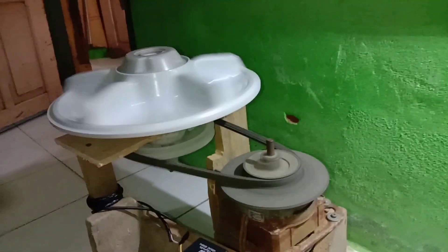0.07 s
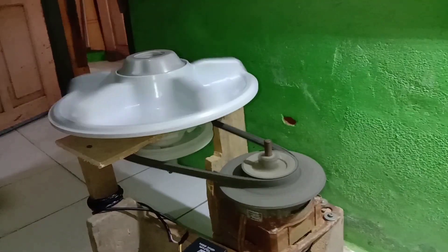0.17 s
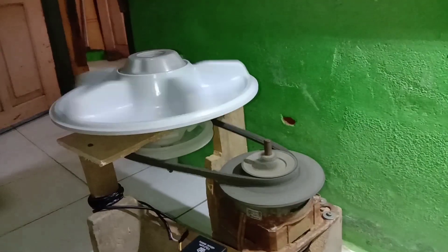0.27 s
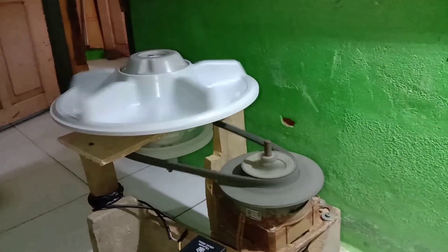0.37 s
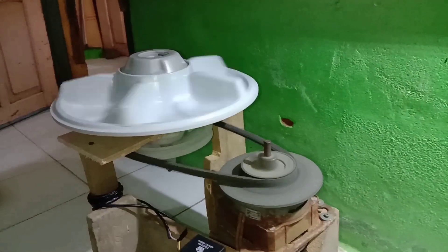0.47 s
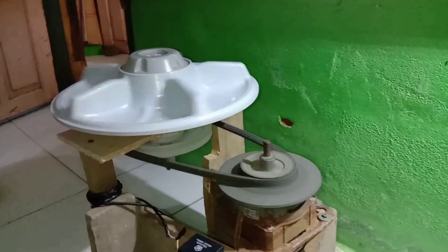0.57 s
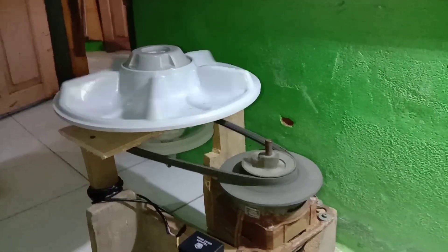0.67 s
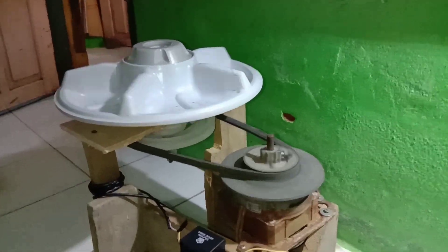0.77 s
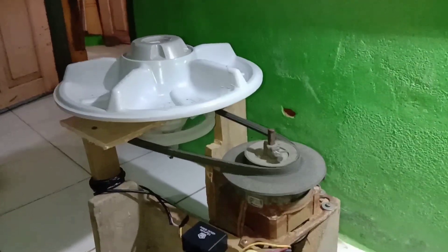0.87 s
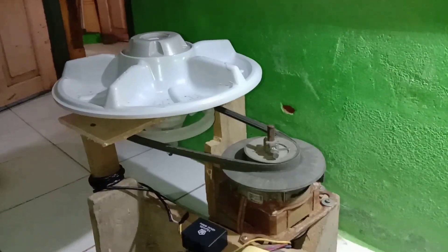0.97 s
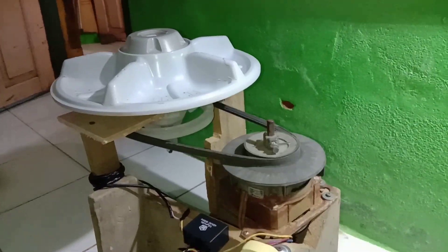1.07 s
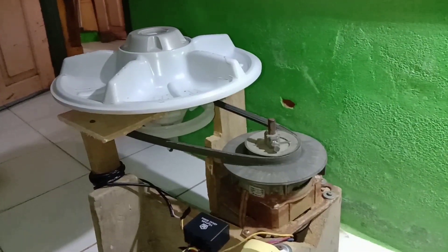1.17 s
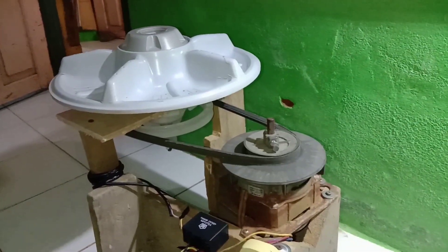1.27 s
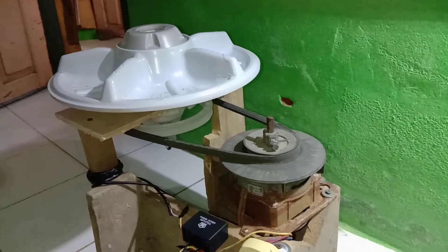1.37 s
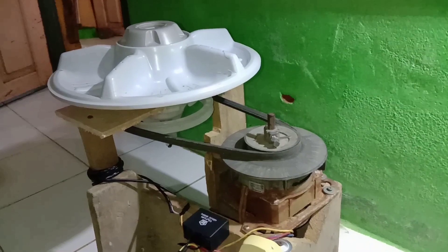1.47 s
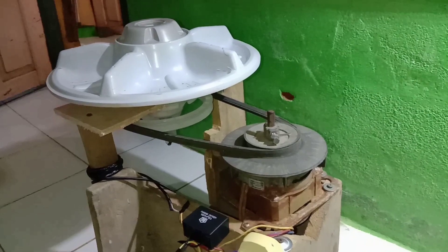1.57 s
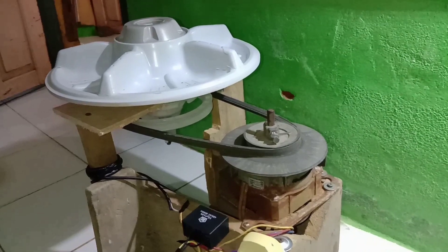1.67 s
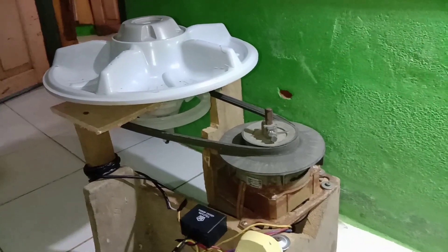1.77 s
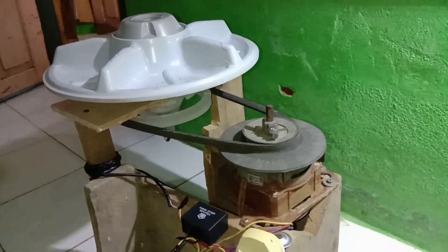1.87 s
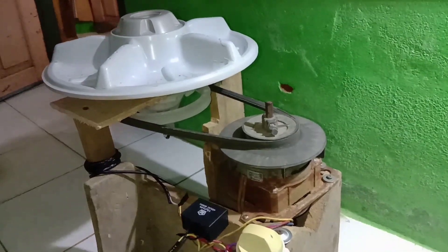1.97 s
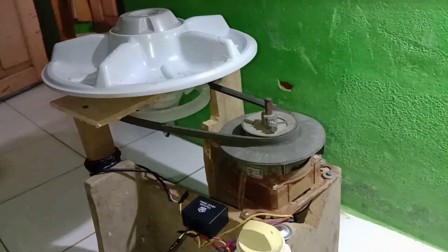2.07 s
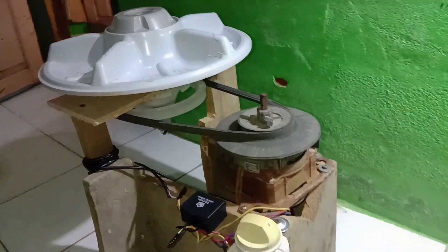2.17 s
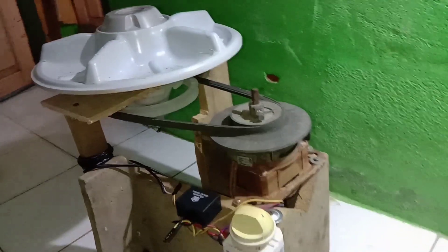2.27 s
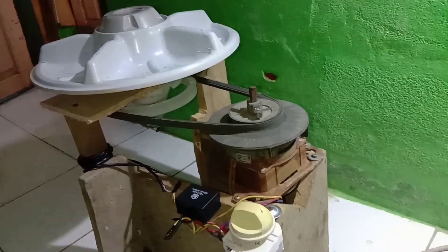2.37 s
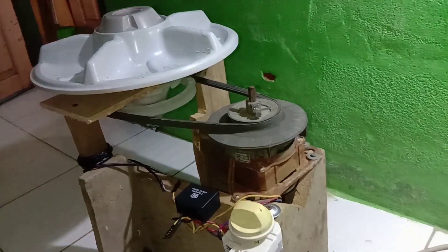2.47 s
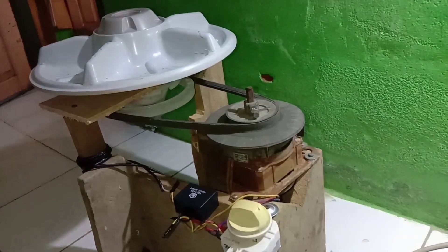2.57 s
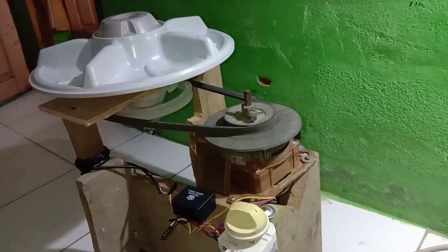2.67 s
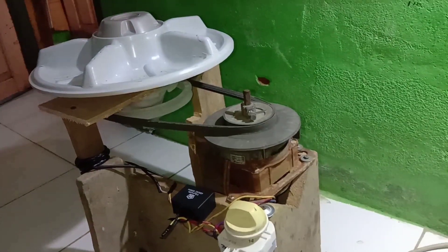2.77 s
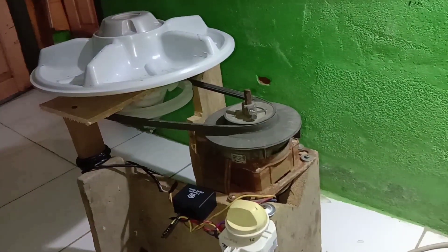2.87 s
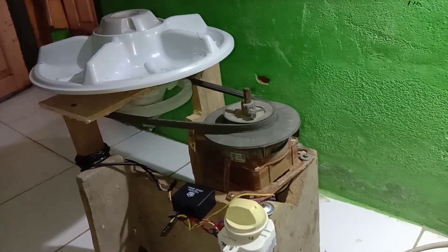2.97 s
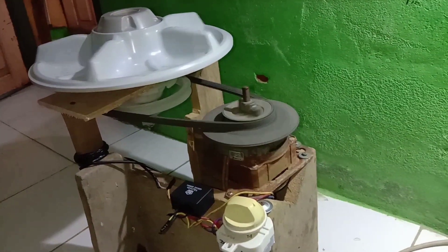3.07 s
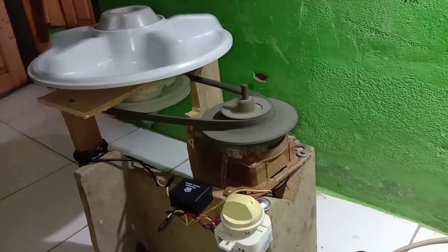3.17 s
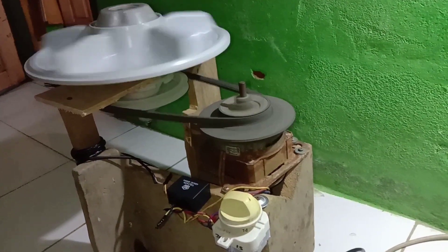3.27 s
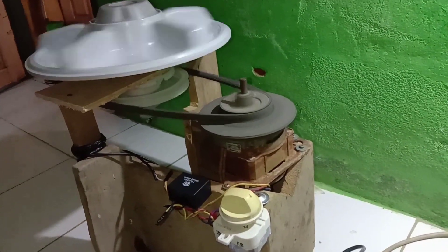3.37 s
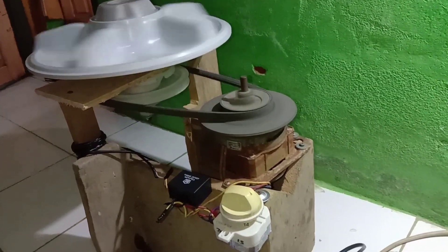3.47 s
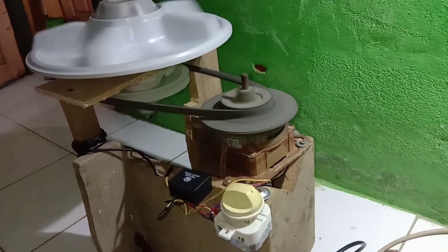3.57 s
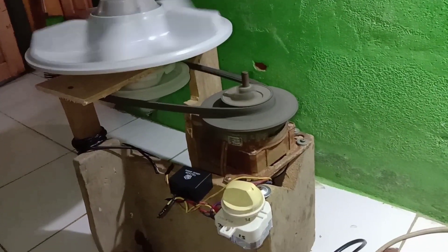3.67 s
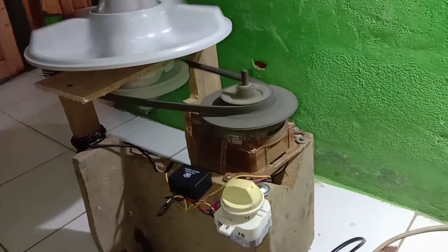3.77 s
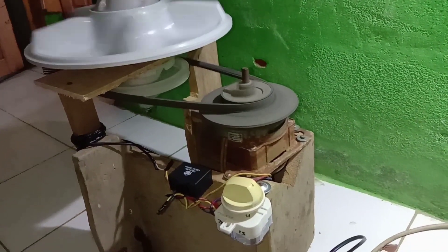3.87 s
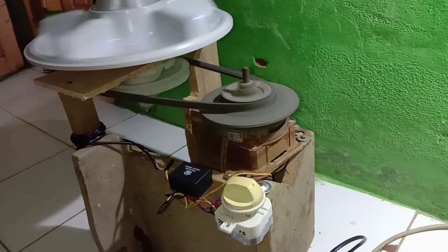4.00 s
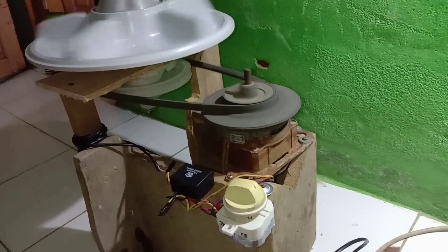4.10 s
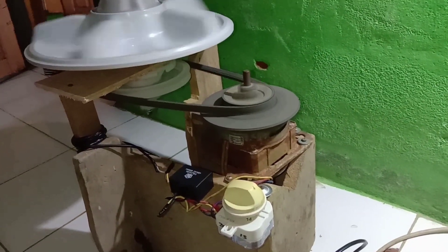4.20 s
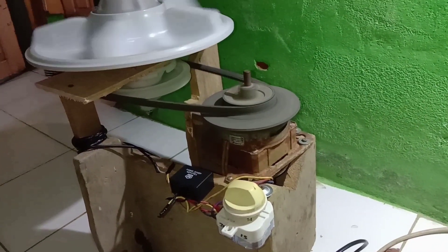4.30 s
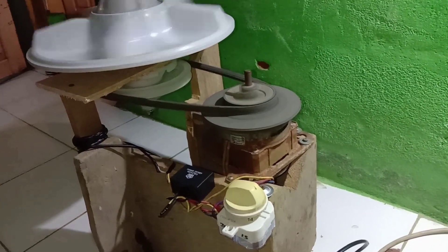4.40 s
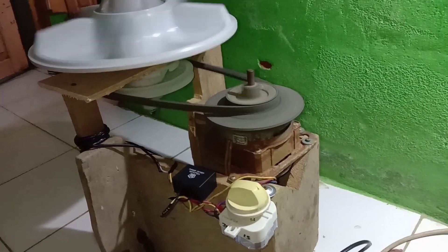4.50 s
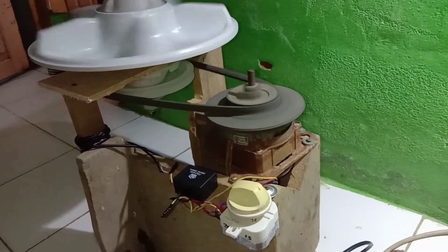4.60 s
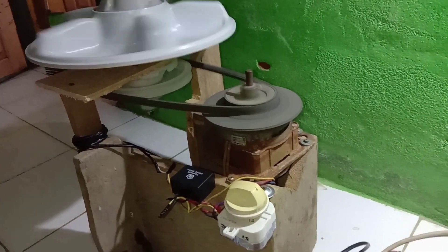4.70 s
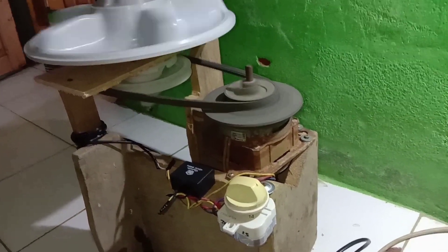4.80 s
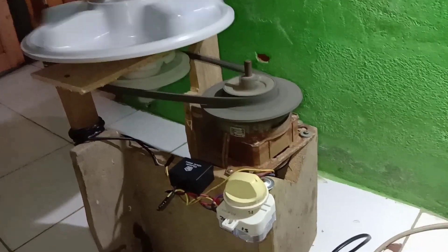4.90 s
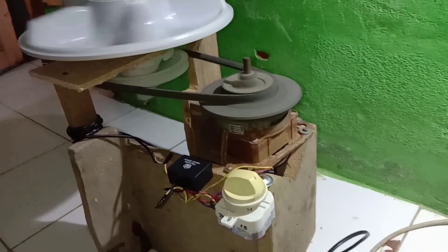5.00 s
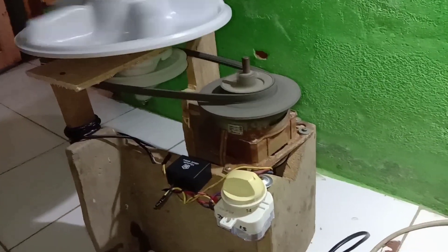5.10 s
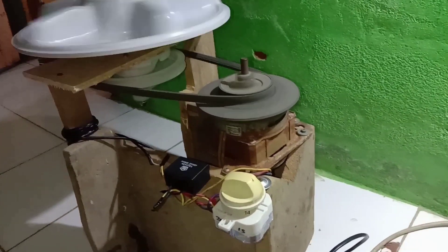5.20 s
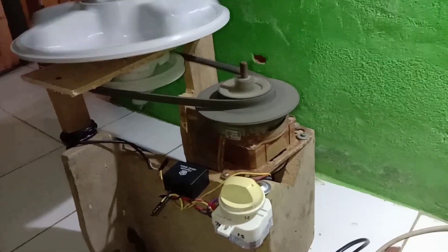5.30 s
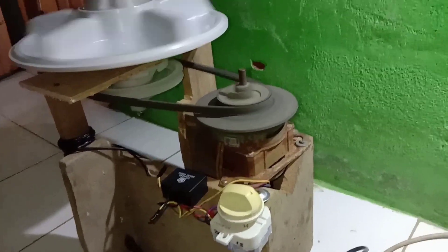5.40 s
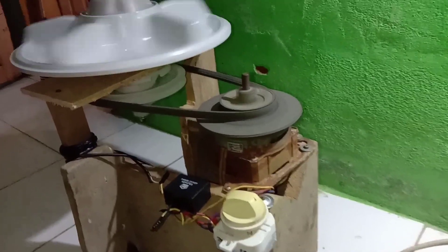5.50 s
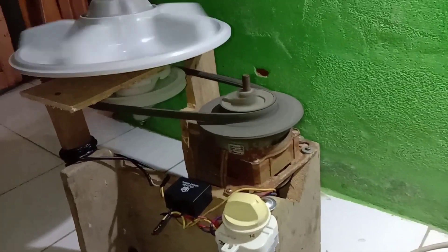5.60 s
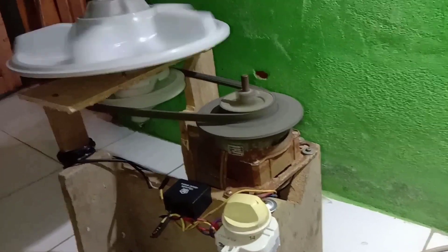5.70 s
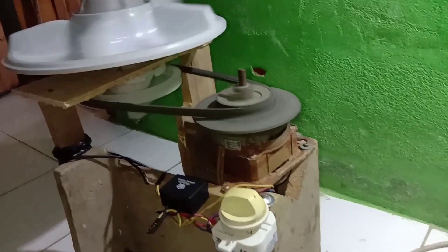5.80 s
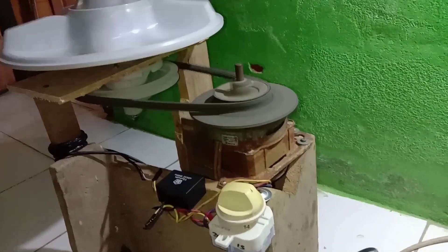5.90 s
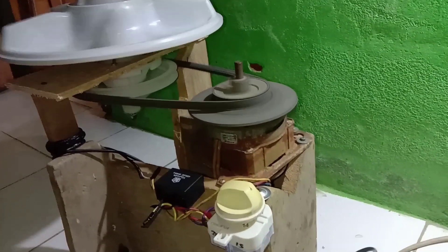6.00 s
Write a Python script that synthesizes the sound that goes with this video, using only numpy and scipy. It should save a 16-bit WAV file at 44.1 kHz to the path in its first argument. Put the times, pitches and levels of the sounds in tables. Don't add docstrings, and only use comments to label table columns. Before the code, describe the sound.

A motor's woody rumble and belt hiss slow and die within a second, loose metal ticking along. Low hum and distant small-engine idle fill the pause, with a tiny dry double snap. Then a loud switch clack with a thump, a brief belt shudder, a second clack, and steady buzzing, knocking rotation, fading out. Near microphone, short tiled-room reflections.

```python
import sys
import numpy as np
from scipy import signal
from scipy.fft import rfft, irfft, next_fast_len
from scipy.io import wavfile
from scipy.ndimage import uniform_filter1d

SR = 44100
rng = np.random.default_rng(int(sys.argv[2]) if len(sys.argv) > 2 else 0)


def boost(x):
    u = np.asarray(x, float) / 20
    return 10 ** u


def put_to_file(sound):
    columns = np.atleast_2d(sound).T
    safe = np.clip(columns, -1, 1)
    whole_steps = np.round(safe * 32767)
    wavfile.write(sys.argv[1], SR, whole_steps.astype(np.int16))


N = 266805

# frequency in Hz, density in dB per Hz.
STAND_SPECTRUM = [(35, -47), (60, -23), (163, -16), (266, -5.5), (345, -7.5), (394, -1.5), (480, -5.5),
                  (521, -9.5), (644, -8.5), (954, -22), (1780, -44), (1930, -25), (3000, -38), (3900, -69),
                  (6600, -120)]
# frequency in Hz, width in Hz, level in dB.
STAND_MODES = [(207.2, 7.3, 0), (264.5, 17, -1), (288.7, 22.5, 5), (346, 15, -5), (477, 18, -2),
               (657, 28, -7), (699.6, 15.6, 0.5)]
# frequency in Hz, density in dB per Hz.
BELT_SPECTRUM = [(530, -35), (900, 0), (1070, -1), (1340, -8), (1780, -8.5), (1930, -3), (2630, -14.5),
                 (3870, -12.5), (4360, -18.5), (5200, -17), (6500, -24), (8630, -33), (12400, -29.5),
                 (15000, -37)]
# frequency in Hz, width in Hz, level in dB.
BELT_MODES = [(1276, 63, -1.5), (1860, 470, -17), (3200, 47, -2.5), (3860, 140, -6.5), (5080, 620, -8.5),
              (5830, 300, -8.5), (7650, 200, 2), (8590, 450, 4)]
# frequency in Hz, width in Hz, level in dB against the hiss.
BEARING_WHINE = (3810, 45, 0)
# multiple of twice mains, level in dB under the rumble.
WINDING_LINES = [(2, -20), (3, -24), (4, -3.5), (6, -17.5), (7, -43)]
# time in seconds, level in dB.
STAND_SHAKE = [(0, 1.5), (.06, -3), (.11, 0), (.2, 0.5), (.29, -3), (.4, -1.5), (.47, -3.5), (.6, -3.5),
               (.9, -5), (2.97, 3), (3.12, 1), (3.3, 0), (3.5, 0.5), (3.65, 0.5), (3.9, 0), (4.2, 0),
               (4.45, -0.5), (4.7, -1), (5.0, -1), (5.3, -1.5), (5.7, -1.5), (6.05, 3.5)]
# frequency in Hz, width in Hz, level in dB.
SLACK_BELT_MODES = [(250, 25, -3), (475, 44, -1), (602, 58, -1), (704, 41, -2), (966, 98, -17)]
# time in seconds, firings a second, level in dB.
ENGINE_IDLE = [
    (0, 32.5, -47),
    (.95, 32.5, -46.5),
    (1.64, 34.55, -44),
    (2.6, 35.2, -44.5),
    (2.9, 36.1, -45.5),
    (3.3, 36.5, -45),
    (6.05, 36.5, -48.5),
]
# time in seconds, lead in firings.
FIRING_LEAD = [
    (0, 0),
    (.87, 0.17),
    (1.17, 0),
    (1.47, .19),
    (1.77, .18),
    (2.07, 0.026),
    (2.4, .06),
    (2.7, 0.066),
    (6.05, .07),
]
# frequency in Hz, width in Hz, level in dB.
EXHAUST_MODES = [(256, 170, -4.5), (376, 66, 0.5), (478, 100, -1), (575, 130, 1.5), (832, 160, -3.5),
                 (1184, 39, -2.5), (1402, 500, -1.5), (1920, 126, -7), (2410, 500, -14), (2780, 280, -17.5),
                 (3284, 750, -12.5), (4180, 230, -15.5), (4850, 560, -21.5), (8000, 1300, -32.5),
                 (9490, 230, -27), (10480, 330, -29)]
# frequency in Hz, width in Hz, level in dB, lag in firings.
CYLINDER_PIPES = [(594, 62, -6.5, 1.95), (473, 70, -7.5, .95), (350, 67, -18.5, .95), (1950, 100, -23, 1.3),
                  (1902, 78, -22, .35), (1455, 160, -17, 1.3), (1443, 130, -17, 0.4),
                  (3500, 1100, -30, 0.12), (3310, 77, -31, 0.13), (2830, 95, -36, 1.14)]
# time in seconds, level in dB, length in seconds, frequency in Hz.
PANEL_TONES = [
    (2.11, -0.5, 0.058, 1200),
    (2.29, -1, 0.056, 1200),
    (1.3, -11, .05, 1200),
    (1.7, -1.5, 0.046, 520),
    (0.96, -10.5, 0.072, 1960),
    (0.11, -1, 0.015, 2200),
]
# frequency in Hz, density in dB per Hz.
ROOM_SPECTRUM = [(20, -16), (40, -23), (150, -12), (300, -14.5), (700, -12), (1500, -27.5), (4000, -34),
                 (6200, -39), (12000, -38), (14500, -39.5), (15500, -36)]
# start in seconds, peak in dB, low board against the rest in dB.
STAND_KNOCKS = [(0.011, -15, 3), (0.046, -10, 0), (0.115, -7, -2.5), (0.148, -13, -2), (0.188, -10.5, 5),
                (0.337, -16, 0), (0.59, -25.5, -2), (3.184, -15, -4), (3.222, -17, 1), (0.258, -9, 2.5),
                (0.454, -14, -7), (0.5, -25, 1.5), (0.556, -23.5, -3), (0.644, -22, -0.5), (0.776, -30, 5),
                (3.132, -13.5, -1), (3.273, -11, -8), (3.324, -25, -7), (3.349, -11, 0), (3.981, -17, -3),
                (4.351, -10, -10), (4.881, -13, -2), (0.306, -13, 1), (0.372, -13.5, 1), (0.713, -42, -5),
                (0.842, -39, 1), (0.872, -33, -3), (0.903, -36, -7), (0.929, -33, 1), (3.476, -12, -9),
                (3.618, -16, 14), (3.844, -20, 2), (4.025, -20, 3), (4.104, -12.5, -4), (4.168, -16.5, 0),
                (4.23, -12, 1), (4.301, -18, -5), (4.421, -17, -3), (4.476, -18, -8), (4.726, -15, -1),
                (4.805, -20, 2), (5.033, -18, 14), (5.07, -17, 5), (5.294, -12, -7), (5.45, -17, 6),
                (5.52, -13, -3), (5.544, -16, -3), (5.621, -24, -4), (5.733, -26, 1), (5.792, -15, -3),
                (5.872, -14, 9)]
# start in seconds, peak in dB, ring in Hz.
WASHER_COAST = [
    (0.0144, -52, 5250),
    (0.0742, -47, 5100),
    (0.1565, -42, 5250),
    (0.1795, -49, 5100),
    (0.2483, -47, 5200),
    (0.3032, -43, 5250),
    (0.3436, -39.5, 4940),
    (0.3865, -57, 5250),
]
# start in seconds, peak in dB after the fade, ring in Hz.
WASHER_LOADED = [(3.2537, -51, 4950), (3.347, -45, 4850), (3.4288, -43, 5000), (3.4937, -53, 5120),
                 (3.5356, -47, 5010), (3.5755, -48, 4430), (3.6164, -46, 5140), (3.6358, -43, 5320),
                 (3.6648, -46, 4470), (3.7176, -40, 5500), (3.798, -45, 6030), (3.8234, -42.5, 5110),
                 (3.8379, -40.5, 5030), (3.904, -39, 5300), (3.9456, -50, 5460), (3.986, -44, 5060),
                 (4.026, -40.5, 5250), (4.0858, -53, 5600), (4.1167, -46, 5010), (4.1671, -43, 5060),
                 (4.2085, -51, 5560), (4.2495, -42, 5100), (4.2739, -47, 4760), (4.2914, -50, 5050),
                 (4.315, -45, 5370), (4.3562, -43, 5100), (4.3966, -57, 5510), (4.4375, -44, 5080),
                 (4.4969, -44, 5290), (4.5672, -51, 4660), (4.5932, -52, 4530), (4.6194, -43, 5100),
                 (4.685, -47, 5520), (4.7014, -45, 4510), (4.7259, -45, 5500), (4.7558, -50, 4680),
                 (4.8073, -44, 5110), (4.8895, -53, 5240), (4.9474, -55, 5020), (5.0546, -55, 5320),
                 (5.0716, -54, 5550), (5.1778, -54, 5320), (5.2601, -56, 5300), (5.3909, -57, 5150),
                 (5.4248, -59, 5360), (5.4657, -55, 5100), (5.5061, -55, 5180), (5.547, -54, 5120),
                 (5.6283, -62, 5240), (5.7595, -55, 4920), (5.7939, -56, 4620), (5.8757, -59.5, 5320),
                 (5.9157, -64, 5190), (5.9576, -56.5, 4900)]
# start in seconds, peak in dB, ring in Hz.
CLIP_TICKS = [(0.0737, -46, 5900), (0.1151, -55, 5860), (0.1411, -48, 5860), (0.182, -44, 5860),
              (0.2219, -55, 5860), (0.2618, -37, 5840), (0.3057, -55, 6000), (0.3441, -42, 5870),
              (0.4369, -44, 6000), (0.4500, -51, 5900), (0.4928, -59, 5870), (0.6374, -45.5, 5850)]
# t60 in seconds, ring in dB, overtone in dB over the crack.
WASHER_RING = (.02, -15.5, -34)
CLIP_RING = (0.041, -1, -2)
# frequency in Hz, width in Hz, level in dB.
TICK_BODY = [(5250, 2850, 4.5), (8840, 1550, 0)]
# start in seconds, peak in dB before the fade, ring in Hz.
BRACKET_PINGS = [(.297, -34, 1500), (4.253, -30, 1980), (4.356, -38, 2000), (4.535, -34, 2250),
                 (4.9482, -43, 1890), (4.9896, -40, 1990), (5.1138, -45, 1930), (5.277, -39, 2000),
                 (5.3598, -40, 1980), (5.5459, -39, 3770), (5.687, -39, 3810), (5.7304, -39, 2100),
                 (5.7589, -36, 1970), (5.8936, -40, 1830), (5.9474, -44, 1880)]
# start in seconds, peak in dB.
ROOM_SNAPS = [
    (1.2254, -41),
    (1.2371, -39.5),
]
# start in seconds, snap in dB, thump in dB.
CONTACTS = [
    (2.976, -21.5, -20.5),
    (3.163, -25, -26),
]
# frequency in Hz, width in Hz, level in dB.
CONTACT_MODES = [
    [(2515, 230, -7), (4730, 270, -8), (5140, 660, -12.5), (3500, 1400, -11), (1400, 930, -14.5),
     (6500, 2800, -16), (11730, 1000, -13), (8400, 1900, -18.5), (13600, 3900, -18)],
    [(2620, 540, -7), (4850, 380, -8), (5300, 1300, -7.5), (6900, 850, -14), (9100, 3100, -18),
     (11500, 1300, -18), (14900, 1500, -18)],
]
# frequency in Hz, t60 in seconds, level in dB.
CASE_RINGS = [
    [(2450, 0.062, 4), (3300, 0.05, -9), (3870, .045, -16), (4612, 0.047, -2.5), (5090, 0.06, -9.5),
     (5700, .03, -16), (11800, .014, -11)],
    [(2510, 0.14, -8), (2850, 0.038, -9), (4500, 0.042, 7), (5050, 0.03, 0), (5800, 0.025, -10),
     (6600, 0.031, -2), (9400, .03, -21), (11650, .02, -19)],
]

TWICE_MAINS_HZ = 99.93
ON_S = 2.975
BITE_S, BITE_RISE_S, SETTLE_S = 3.118, 0.015, 0.18
FADE_FROM_S, FADE_TO_S = 2.976, 6.185


def unit(x):
    return x / np.sqrt(np.mean(x ** 2))


def ramp(start_s, length_s):
    return np.clip((np.arange(N) / SR - start_s) / length_s, 0, 1)


def curve(rows):
    s, *columns = np.transpose(rows)
    return [np.interp(np.arange(N) / SR, s, c) for c in columns]


def colour(x, spectrum):
    hz, db = np.transpose(spectrum)
    size = next_fast_len(N)
    f = np.fft.rfftfreq(size, 1 / SR) + 1
    gain = boost(np.interp(np.log(f), np.log(hz), db))
    return unit(irfft(rfft(x, size) * gain, size)[:N])


def ring(x, modes):
    return sum(boost(db) * signal.lfilter(*signal.iirpeak(hz, hz / width, fs=SR), x) for hz, width, db in modes)


def ring_twice(x, modes, widen=1):
    return sum(ring(ring(x, [(hz, width, db)]), [(hz, widen * width, 0)]) for hz, width, db in modes)


def grains(spread_db, grain_s):
    k = int(grain_s * SR)
    size = np.zeros(N)
    size[::k] = boost(spread_db * np.minimum(rng.exponential(size=len(size[::k])), 4))
    return unit(rng.standard_normal(N) * signal.lfilter([1], [1, -np.exp(-1 / k)], size))


def walk(rate_hz):
    k = int(SR / rate_hz)
    held = np.repeat(rng.standard_normal(N // k + 1), k)
    return unit(uniform_filter1d(uniform_filter1d(held, k), k)[:N])


def add(out, s, sound):
    i = int(s * SR)
    out[i:i + len(sound)] += sound[:N - i]


def peak(x):
    return x / np.abs(x).max()


def blow_time():
    return np.arange(SR // 8) / SR


def blow(modes, crack_s, crack_db):
    t = blow_time()
    y = boost(crack_db) * rng.standard_normal(len(t)) * np.exp(-t / crack_s)
    for hz, t60_s, db in modes:
        y = y + boost(db) * np.sin(2 * np.pi * hz * t) * np.exp(-np.log(1000) * t / t60_s)
    return peak(y)


def drive():
    coast = 1 - ramp(0.06, 0.85)
    grip, live = ramp(BITE_S, BITE_RISE_S), ramp(ON_S, 0.041)
    turns_hz = np.maximum(25 * (coast + ramp(ON_S, 0.33)), 3)
    rumble_db = -27 - 8.5 * (1 - grip) - 5.5 * (1 - ramp(BITE_S, SETTLE_S))
    hiss_db = -47 - 8.5 * (1 - grip)
    rumble = boost(-22) * coast ** 2.77 + live * boost(rumble_db)
    hiss = boost(-41.5) * coast ** 1.5 + live * boost(hiss_db)
    return turns_hz, rumble, hiss


def stand_rumble(angle, belt):
    steps = 128
    size_db = 1.3 * np.minimum(rng.exponential(size=(160, steps)), 4)
    bumps = rng.standard_normal((160, steps)) * boost(size_db)
    bumps = signal.lfilter([1], [1, -0.35], bumps, axis=0).ravel()
    clatter = unit(np.interp(angle * steps, np.arange(len(bumps)), bumps)) + 1.3 * grains(2.3, .005)
    rumble = colour(clatter + ring(clatter, STAND_MODES), STAND_SPECTRUM)
    return rumble * belt * boost(0.46 * walk(30)) * boost(curve(STAND_SHAKE)[0])


def belt_hiss(lobes):
    rub = grains(3.9, .003) * (1 + 0.29 * lobes) * boost(0.82 * walk(30))
    crackle = sum(ring(grains(5.3, .003), [mode]) for mode in BELT_MODES)
    hiss = colour(0.73 * rub + unit(crackle), BELT_SPECTRUM)
    whine = unit(ring(grains(2.5, 0.0037), [BEARING_WHINE]))
    return hiss + boost(BEARING_WHINE[2] - 14) * whine * ramp(BITE_S, SETTLE_S)


def belt_shudder():
    slack = ramp(ON_S, .03) * (1 - ramp(BITE_S, 0.062)) * boost(-36)
    return slack * unit(sum(ring_twice(grains(3, .008), [mode]) for mode in SLACK_BELT_MODES))


def winding_hum(belt, lobes):
    t = np.arange(N) / SR
    lines = sum(boost(db + 2.0 * walk(22)) * np.sin(2 * np.pi * k * TWICE_MAINS_HZ * t + k)
                for k, db in WINDING_LINES)
    lines = lines * (belt + 0.39 * lobes) * ramp(BITE_S, BITE_RISE_S)
    drum_hz = 264 * (1 + 0.016 * walk(12))
    drum = np.sin(2 * np.pi * np.cumsum(drum_hz) / SR) * boost(-8 + 2.1 * walk(13))
    return lines + drum * ramp(BITE_S, SETTLE_S)


def motor():
    turns_hz, rumble_gain, hiss_gain = drive()
    angle = np.cumsum(turns_hz) / SR
    belt = 1 + 0.045 * np.sin(2 * np.pi * 9.5 * np.arange(N) / SR)
    lobes = np.sin(6 * np.pi * angle)
    shaken = stand_rumble(angle, belt) + winding_hum(belt, lobes)
    return rumble_gain * shaken + hiss_gain * belt_hiss(lobes) + belt_shudder()


def engine():
    firings_hz, level_db = curve(ENGINE_IDLE)
    cycle = np.cumsum(firings_hz) / SR + 0.688 + curve(FIRING_LEAD)[0]
    cycle = cycle + 0.012 * np.sin(np.pi * cycle)
    sizes = boost(0.56 * rng.standard_normal(256) + 1.9 * (-1) ** np.arange(256))
    size = sizes[cycle.astype(int)]
    rise = (cycle % 1) / .17
    puff = size * rise * np.exp(1 - rise) + 1
    puff = puff / np.sqrt(uniform_filter1d(puff ** 2, SR // 4))
    bang = boost(-11) * unit(np.diff(np.floor(cycle - .14), prepend=0) * size)
    gas = grains(1.3, .002)
    exhaust = unit(sum(ring_twice(puff * (0.73 * gas + 0.64 * grains(0.99, .002)) + bang, [mode])
                       for mode in EXHAUST_MODES))
    exhaust = exhaust + cylinder_pipes(cycle, size) + panel_tones(cycle)
    return boost(level_db) * (exhaust + boost(-30) * valve(cycle, size))


def cylinder_pipes(cycle, size):
    out = np.zeros(N)
    for hz, width, db, lag in CYLINDER_PIPES:
        fire = np.diff(np.floor((cycle - lag) / 2), prepend=0) * size * boost(walk(20))
        fire[0] = 0
        out = out + boost(db) * unit(ring_twice(fire, [(hz, width, 0)]))
    return out


def panel_tones(cycle):
    t = np.arange(N) / SR
    sing = sum(boost(db) * np.exp(-((t - s) / length_s) ** 2) * np.sin(2 * np.pi * hz * t)
               for s, db, length_s, hz in PANEL_TONES)
    return sing * (1 + 0.27 * np.sin(2 * np.pi * cycle))


def valve(cycle, size):
    tap = size * np.exp(-((cycle - 0.93) % 2) / 0.25) * rng.standard_normal(N)
    return unit(ring_twice(tap, [(7840, 420, 0)]))


def room():
    t = np.arange(N) / SR
    duck = ramp(BITE_S, 0.52)
    hum_db = -48.5 + 5.5 * (1 - ramp(0.33, 0.11)) - 23 * duck
    drone_db = -52.5 - 5.5 * duck + 0.5 * walk(3.1)
    air_db = -51 - 3.5 * duck
    hum = np.sqrt(2) * np.sin(2 * np.pi * (TWICE_MAINS_HZ + 0.13) * t) * boost(0.29 * walk(8.5))
    drone_modes = [(32, 9, -6), (42.5, 11, 11), (55.6, 13, -23), (71.5, 7.4, -22)]
    drone = unit(ring(rng.standard_normal(N), drone_modes))
    air = colour(rng.standard_normal(N), ROOM_SPECTRUM) * boost(0.36 * walk(6.1))
    return boost(hum_db) * hum + boost(drone_db) * drone + boost(air_db) * air


def stand_knocks():
    out, onset = np.zeros(N), np.minimum(blow_time() / 0.0043, 1)
    for s, db, low_db in STAND_KNOCKS:
        boards = [(258.5, 0.089, -0.5 + 2 * low_db), (407.6, 0.037, 6.0), (657, 0.05, -1.5), (870, 0.046, -8.5)]
        add(out, s + 0.00098, boost(db - 0.5) * onset * blow(boards, 0.0024, -33.0))
    return signal.sosfilt(signal.butter(2, 170, "high", fs=SR, output="sos"), out)


def loose_ticks():
    ticks, fade = np.zeros(N), fade_out()
    for part, (t60_s, ring_db, over_db) in ((WASHER_COAST + WASHER_LOADED, WASHER_RING), (CLIP_TICKS, CLIP_RING)):
        for s, db, hz in part:
            modes = [(hz, t60_s, ring_db), (1.29 * hz, 1.4 * t60_s, over_db)]
            add(ticks, s, boost(db + 5.5) / fade[int(s * SR)] * blow(modes, 0.0055, 0.0))
    return ring_twice(ticks, TICK_BODY)


def bracket_pings():
    out, onset = np.zeros(N), np.minimum(blow_time() / .002, 1)
    for s, db, hz in BRACKET_PINGS:
        ping = blow([(hz, .05, 0), (0.63 * hz, .04, -6)], 0.0047, -5)
        add(out, s, boost(db) * onset * ring(ping, [(hz, 1800, 0)]))
    return out


def room_snaps():
    out = np.zeros(N)
    for s, db in ROOM_SNAPS:
        snap = blow([(8800, .012, -13), (7050, .012, -15)], .0015, 0)
        add(out, s, boost(db) * ring(snap, [(11500, 9000, 0)]))
    return out


def contact_snap(modes, rings):
    t = blow_time()
    envelope = np.minimum(t / 0.0049, 1) * np.exp(-t / 0.0051) + 0.053 * np.exp(-t / 0.019)
    snap = ring_twice(rng.standard_normal(len(t)) * envelope, modes, widen=3)
    return peak(peak(snap) + 1.5 * np.minimum(t / 0.0056, 1) * blow(rings, .001, -60))


def contact_thump():
    t = blow_time()
    push = rng.standard_normal(len(t)) * (np.exp(-t / 0.011) + .07 * np.exp(-t / .06))
    push = signal.sosfilt(signal.butter(2, 900, fs=SR, output="sos"), push)
    thump = ring(push, [(415, 25, 6.0), (620, 24, 4.0), (790, 45, -22)])
    boards = [(472, 0.075, 14), (348, 0.18, -1), (600, 0.09, -5), (920, 0.079, -2), (1320, 0.081, -6),
              (1990, .055, -1.5)]
    return peak(peak(thump) + 1.5 * blow(boards, .002, -14.0))


def timer_switch():
    out = np.zeros(N)
    for (s, snap_db, thump_db), modes, rings in zip(CONTACTS, CONTACT_MODES, CASE_RINGS):
        add(out, s - .002, boost(snap_db) * contact_snap(modes, rings))
        add(out, s + .0015, boost(thump_db) * contact_thump())
    return out


def tiled_wash(dry):
    t = np.arange(SR // 3) / SR
    tail = rng.standard_normal(len(t)) * np.exp(-np.log(1000) * t / 0.26) * (t > .006)
    wet = signal.fftconvolve(dry, tail / np.linalg.norm(tail))[:N]
    return signal.sosfilt(signal.butter(1, 5000, fs=SR, output="sos"), wet)


def fade_out():
    return 1 - ramp(FADE_FROM_S, FADE_TO_S - FADE_FROM_S)


def scene():
    rig = motor() + stand_knocks() + loose_ticks() + bracket_pings() + room_snaps() + timer_switch()
    return (rig + boost(-9.5) * tiled_wash(rig) + engine() + room())[None]


def roll_off(x):
    return signal.sosfilt(signal.butter(12, 15660, fs=SR, output="sos"), x)


def record(dry):
    mix = dry * fade_out()
    mix = signal.sosfilt(signal.butter(1, 30, "high", fs=SR, output="sos"), mix)
    mix = signal.sosfilt(signal.ellip(10, .3, 80, 15600, fs=SR, output="sos"), mix)
    return roll_off(mix)


dry = scene()
out = record(dry)
put_to_file(out)
```